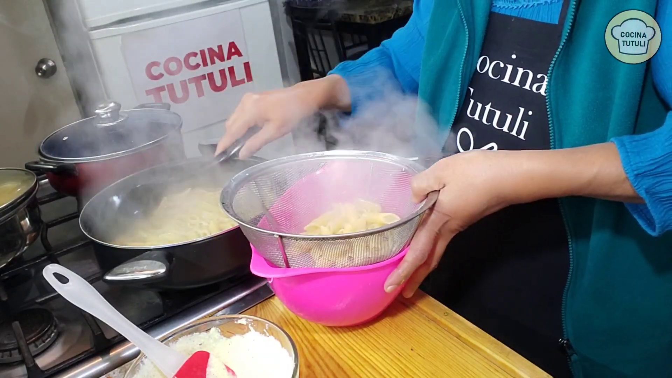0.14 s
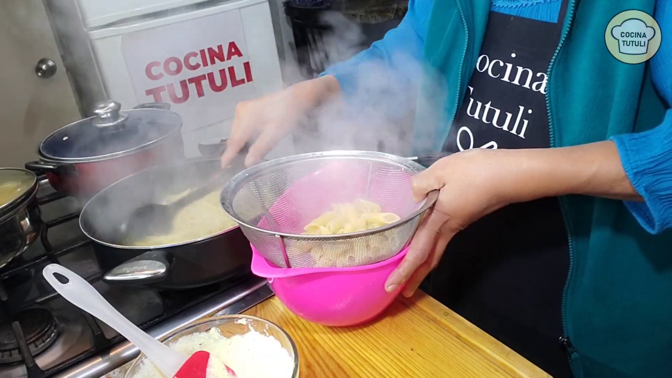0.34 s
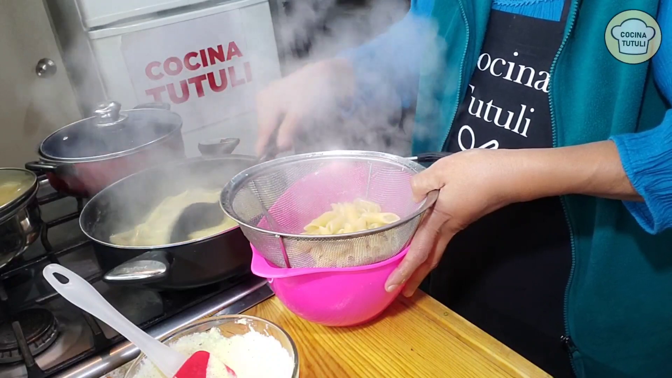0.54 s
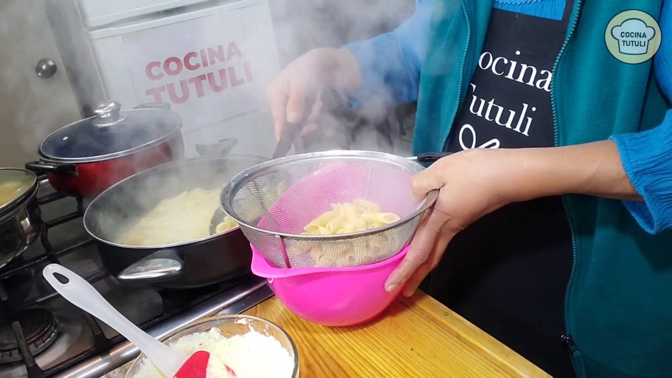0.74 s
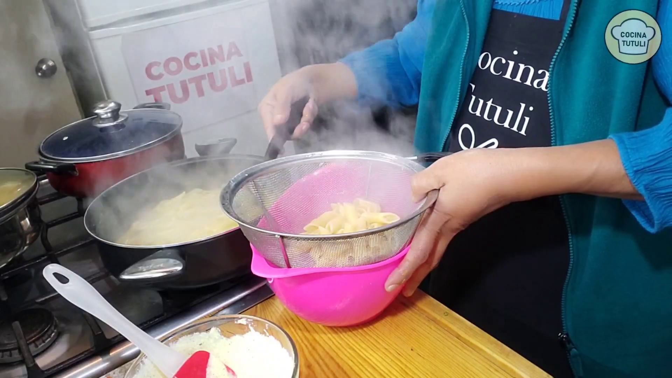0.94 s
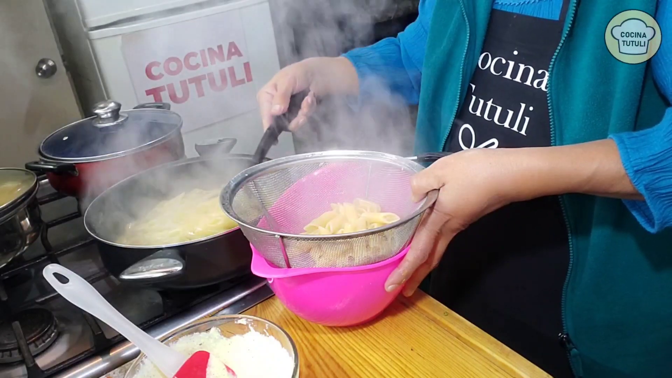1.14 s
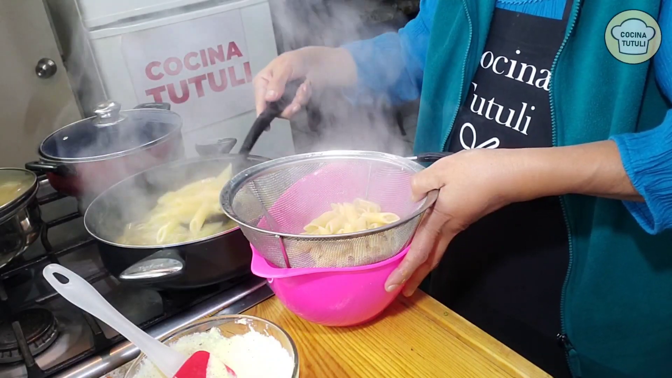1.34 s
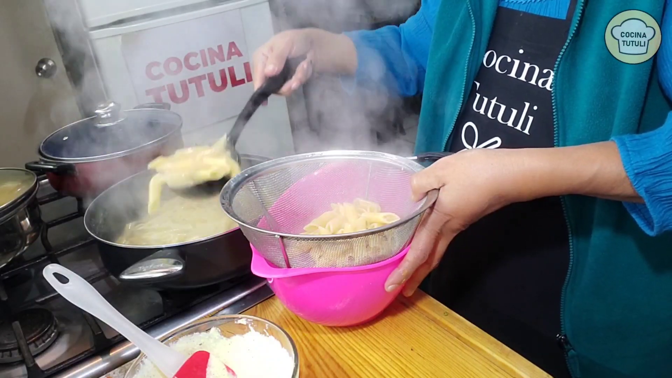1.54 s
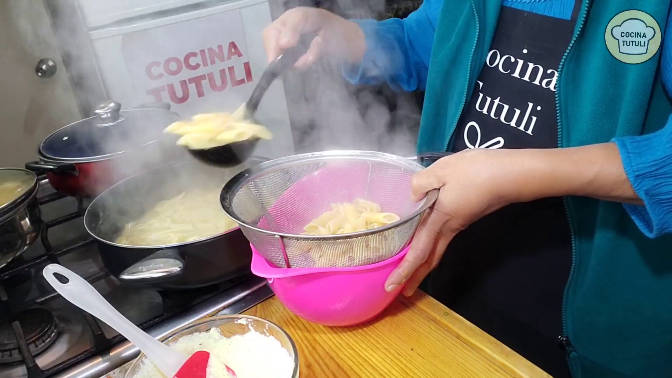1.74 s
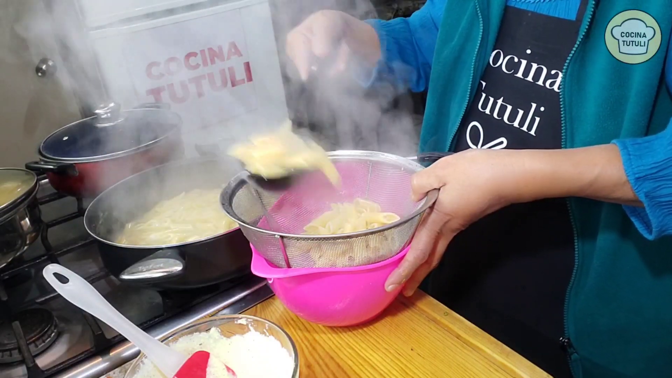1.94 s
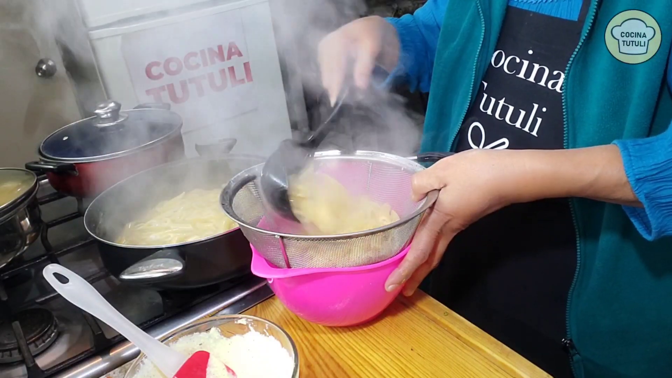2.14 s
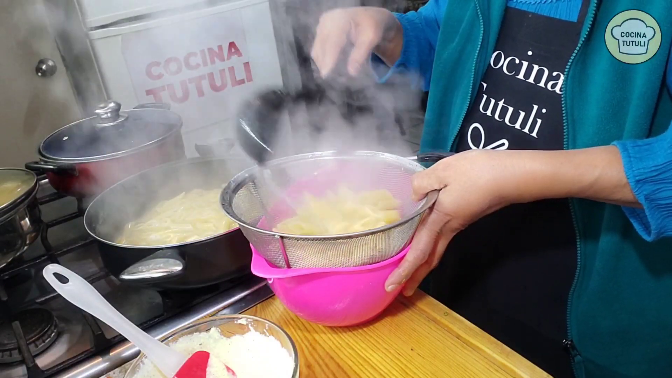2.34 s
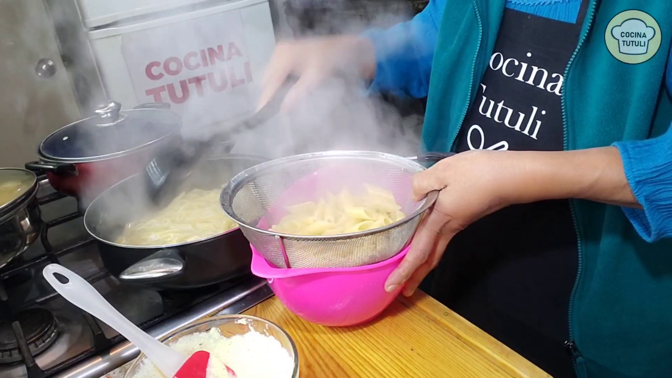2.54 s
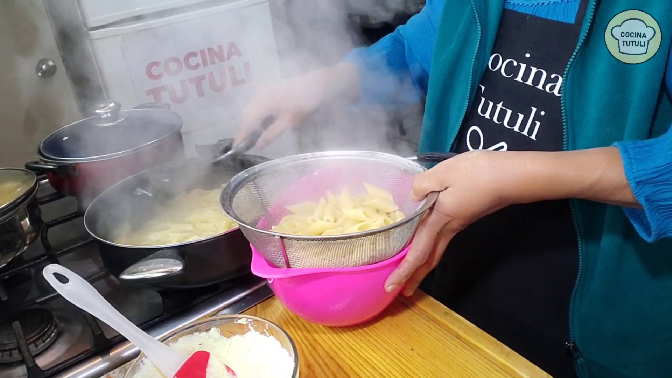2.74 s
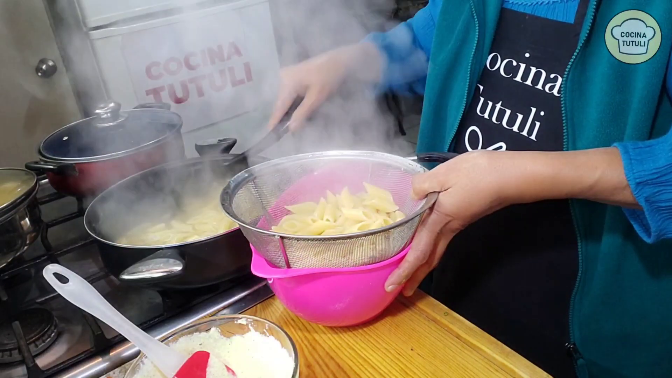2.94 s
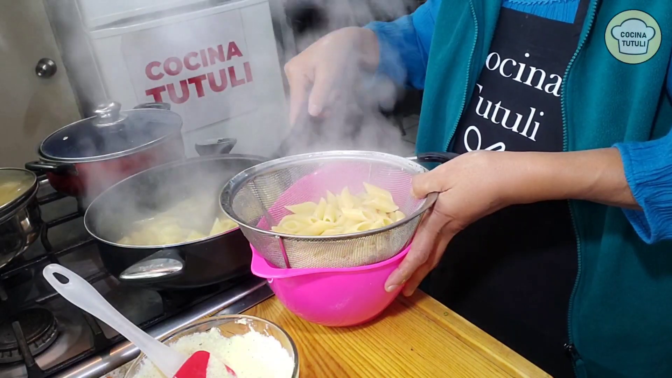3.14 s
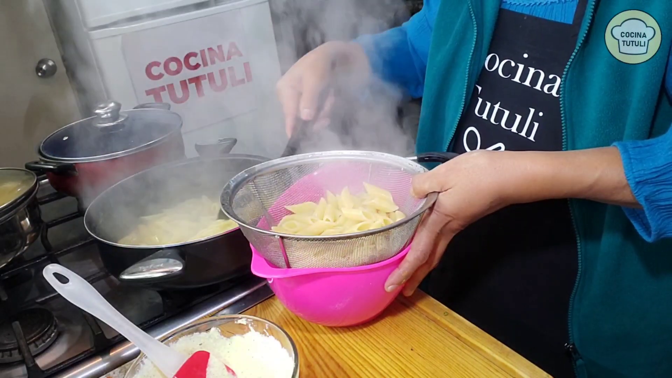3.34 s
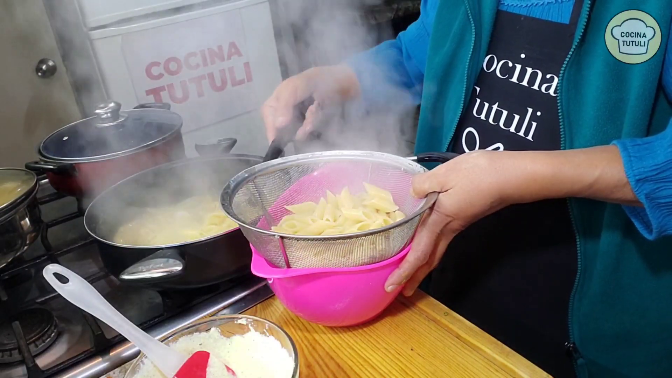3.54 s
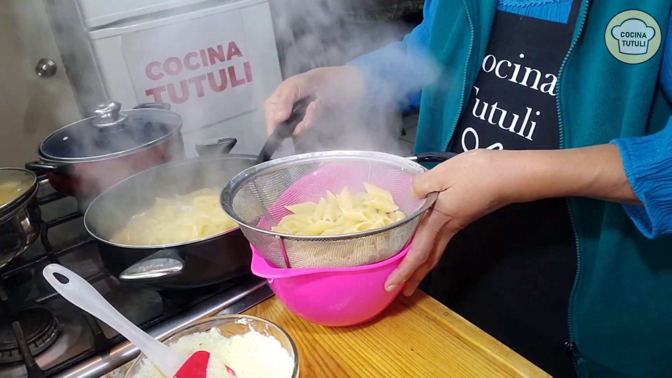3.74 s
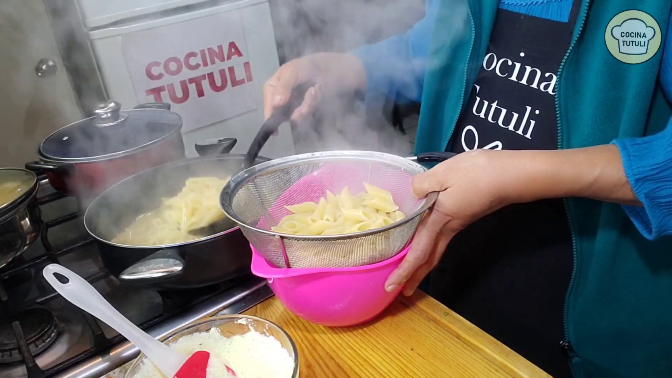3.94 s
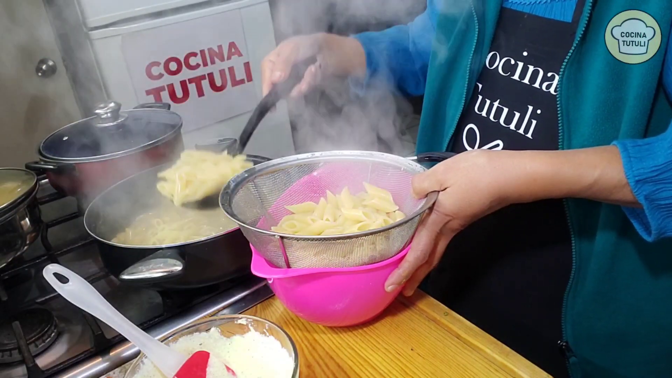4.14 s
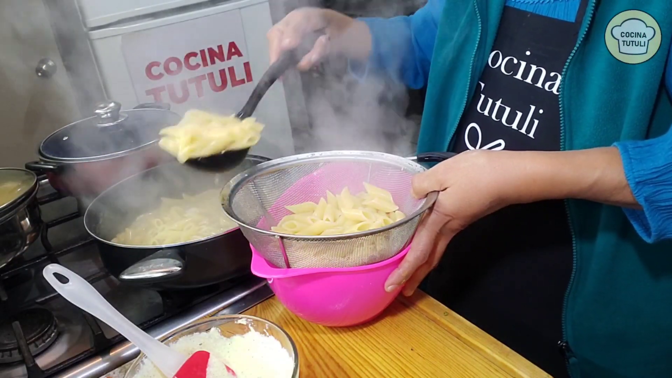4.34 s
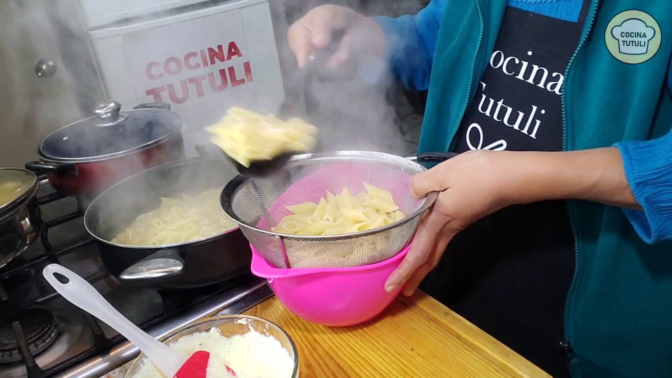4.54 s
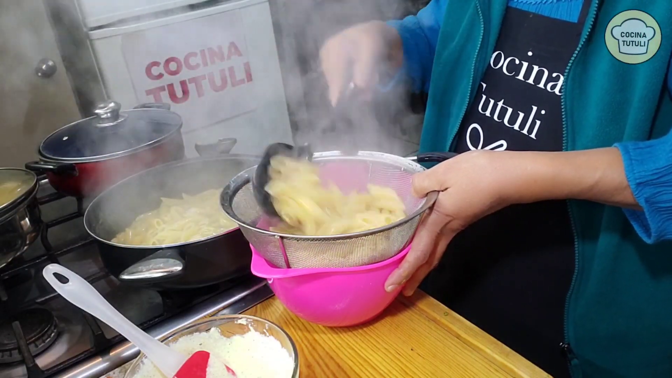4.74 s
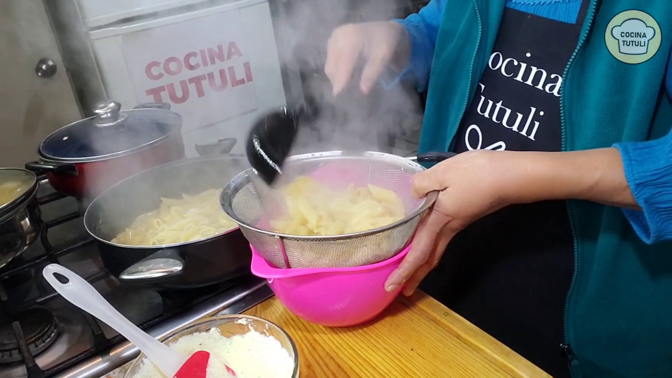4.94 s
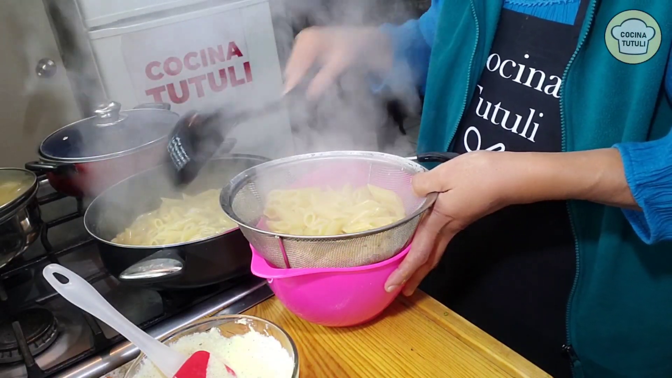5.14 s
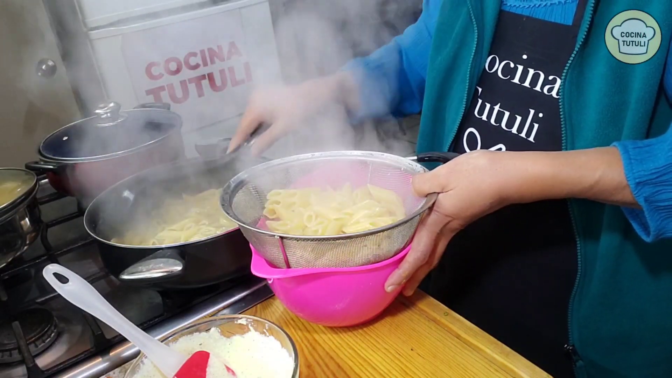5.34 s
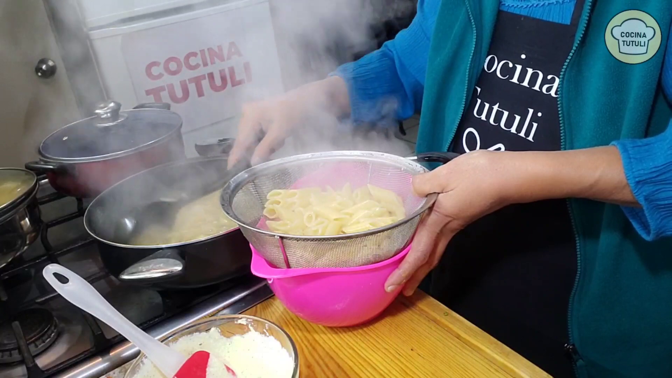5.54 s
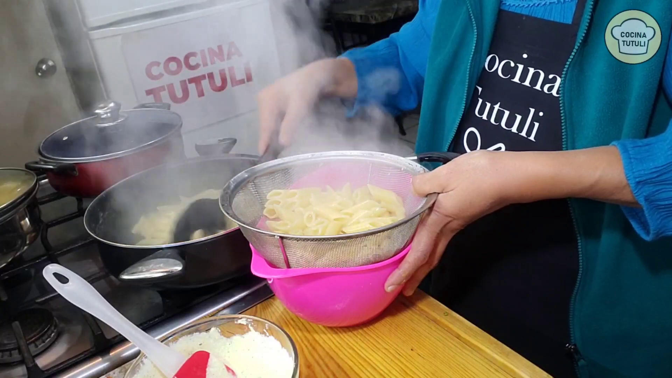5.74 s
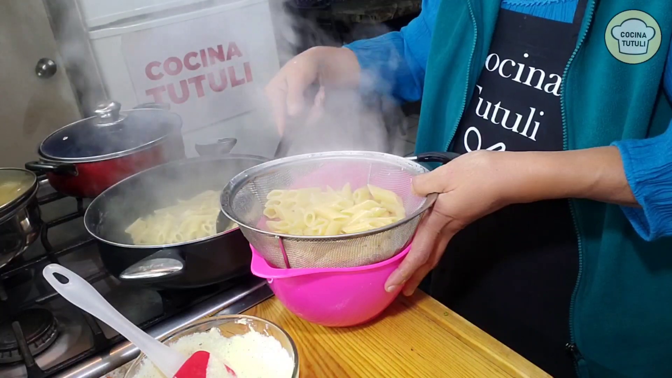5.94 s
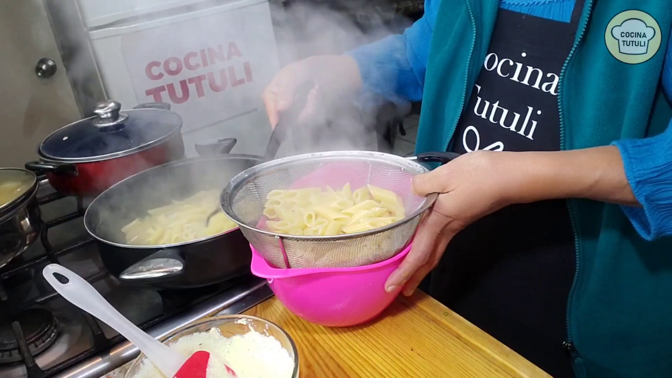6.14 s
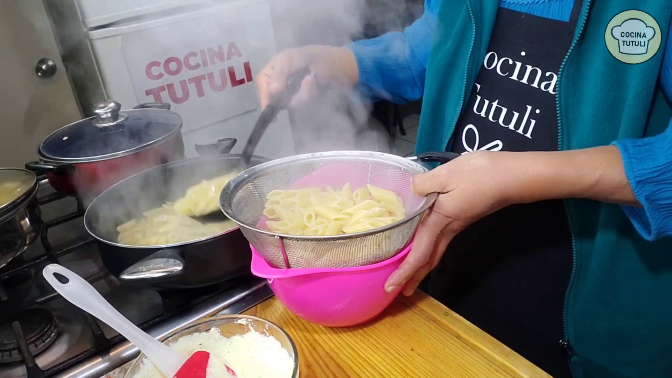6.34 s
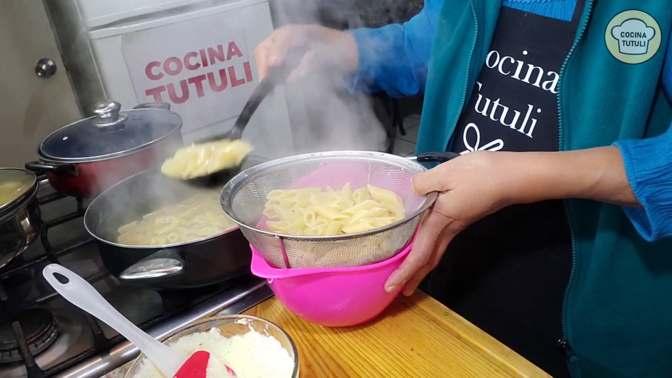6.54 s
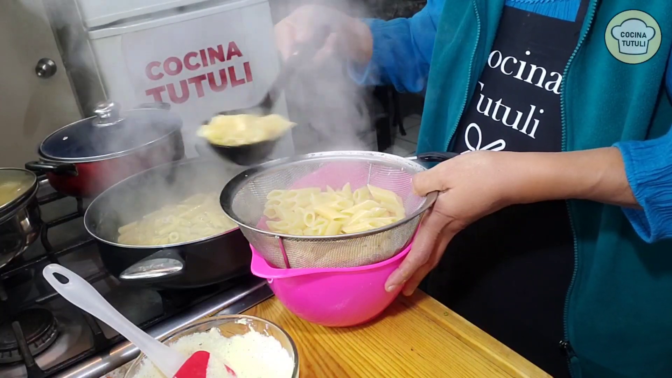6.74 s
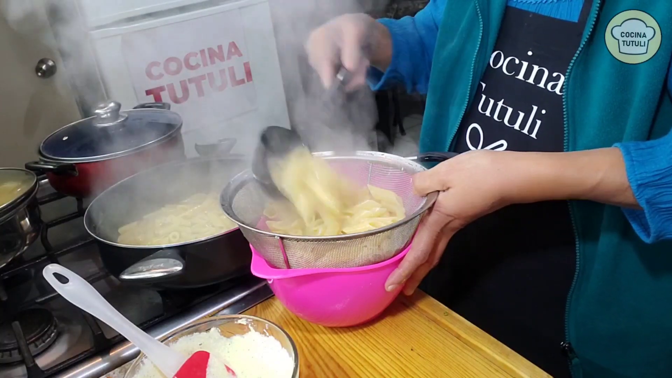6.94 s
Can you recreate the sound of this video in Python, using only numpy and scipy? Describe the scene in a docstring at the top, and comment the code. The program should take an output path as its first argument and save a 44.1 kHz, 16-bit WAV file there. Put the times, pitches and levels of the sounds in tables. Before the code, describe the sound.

A ladle knocks and scrapes in a wide pot of watery boiled pasta, with wet slops and dripping splashes into a strainer over a plastic bowl.

```python
"""A low hum from a wide pot on its stove grate runs throughout, with faint water and room noise; a ladle
knocks from the start. It scoops boiled pasta and tips it into a mesh strainer over a plastic bowl: filtered
noise makes the slosh, spray and scrape, dying sine waves ring the pot, and short noise bursts are the
falling drops. Sparse echoes make the small kitchen, and two microphone ports hear it all."""
import sys
import numpy as np
from scipy import signal
from scipy.fft import rfft, irfft, next_fast_len
from scipy.io import wavfile
from scipy.ndimage import uniform_filter1d

SR = 44100
rng = np.random.default_rng(int(sys.argv[2]) if len(sys.argv) > 2 else 0)


def bounce(signal):
    """Save signal as a 16-bit WAV file at the path given by the first command-line argument."""
    frames = np.transpose(np.atleast_2d(signal))
    limited = np.clip(frames, -1, 1)
    pcm = np.round(limited * 32767).astype(np.int16)
    wavfile.write(sys.argv[1], SR, pcm)


N = 307818  # length of the sound [samples]

# All levels are relative: the mix and the microphone ports scale them further.
# the pot's two bands of hum: (centre [Hz], width of the first of two filters [Hz])
HUM_BANDS = [(59, 15.4), (87, 10)]
# steady hum: (lower band [dB], upper band [dB])
HUM_STEADY = [-54, -56.5]
# the hum swells as the pot is pushed: (start [s], time until the fall [s], lower band [dB], upper band [dB])
HUM_SWELLS = [(0.1, 0.031, -58, -35), (0.36, 0.12, -53, -43), (0.56, 0.15, -46, -63),
              (0.7, 0.016, -47, -36.5), (2.74, 0.26, -51, -56.5), (3.36, 0.11, -47, -46),
              (4.1, 0.34, -70, -58), (5.45, 0.22, -53, -43.5), (5.9, 0.14, -48, -44),
              (6.03, 0.068, -52, -35)]
SWELL_RISE_S, SWELL_FALL_DB_PER_S = 0.078, 174
# the hum dips: (middle [s], half width [s], change of lower band [dB], change of upper band [dB])
HUM_DIPS = [(2.5, 0.35, -5.5, -8), (3.77, 0.11, -3, -15)]

# colour of the quiet room noise: (frequency [Hz], level per Hz [dB])
ROOM_COLOUR = [(12, -18), (20, -8), (53, -30), (79, 0), (138, -15), (234, -2), (410, -56), (802, -9),
               (897, -19), (1120, -10.5), (4180, -71), (7310, -55), (9950, -36), (16000, -45.5)]
ROOM_TONE_DB = -63.5
# how alike the ports are in spread-out sound: (frequency [Hz], likeness [0 to 1, higher is clipped])
PORT_LIKENESS = [(60, 1), (300, 0.85), (600, 0.84), (1500, 0.014), (15000, 0.022)]

# colour of the sloshing water: (frequency [Hz], level per Hz [dB])
SLOSH_COLOUR = [(240, -4), (400, -1), (486, -17), (591, -2), (748, -5.5), (1960, -11), (2260, -12.5),
                (7310, -44.5), (9000, -77), (11700, -59), (19800, -120)]
# colour of the fine spray: (frequency [Hz], level per Hz [dB])
SPRAY_COLOUR = [(880, -8), (1500, -16), (2640, 2), (3200, 4.5), (4240, 0), (7540, -2.5), (9470, -2.5),
                (11700, 0), (14300, -13.5), (16000, -2)]
# colour of the ladle dragging on the pot: (frequency [Hz], level per Hz [dB])
SCRAPE_COLOUR = [(65, -17), (110, -13), (140, -4), (216, 8.5), (260, -9.5), (343, -5.5), (383, -18.5),
                 (483, -12.5), (590, -5), (700, -9.5), (910, -55), (1540, -120)]
# the ladle drawn through the pot: (start [s], time until the fall [s], slosh [dB], spray [dB], drag on the pot [dB])
LADLE_STROKES = [(0.1, 0.11, -68, -67, -65), (0.34, 0.21, -55, -70.5, -63), (0.55, 0.21, -59, -67, -52.5),
                 (1.25, 0.2, -70, -72, -64), (2.74, 0.25, -52, -66.5, -51), (3.3, 0.22, -65.5, -76.5, -67),
                 (3.8, 0.2, -71.5, -73, -63), (4.06, 0.45, -76, -101, -62), (5.38, 0.2, -52.5, -68, -56),
                 (5.59, 0.27, -52, -67, -71), (5.88, 0.2, -59.5, -79, -58.5)]
STROKE_RISE_S, STROKE_FALL_DB_PER_S = 0.054, 62.5
# water running off the ladle, and ladlefuls tipped into the strainer:
# (start [s], time until the fall [s], slosh [dB], spray [dB])
WATER_POURS = [(1.6, 0.29, -72.5, -69), (2.06, 0.11, -62, -55), (2.19, 0.2, -61, -58.5),
               (2.38, 0.25, -56.5, -64.5), (3.1, 0.16, -61, -67), (4.57, 0.1, -67.5, -102),
               (4.68, 0.12, -60, -60), (4.85, 0.13, -65.5, -90), (5.02, 0.3, -66, -70.5)]
POUR_RISE_S, POUR_FALL_DB_PER_S = 0.06, 79
STILL_SLOSH_DB, STILL_SPRAY_DB, STILL_DRAG_DB = -79.5, -84, -67.5
# ringing of the bowl: (frequency [Hz], level [dB], time to fall 60 dB [s])
BOWL_MODES = [(652, 0, .058), (372, -11, .07)]
BOWL_IN_POURS_DB = -13  # against the slosh of the pour

# ringing of the pot with its water, lowest strong mode first:
# (frequency [Hz], level [dB], undamped time to fall 60 dB [s])
POT_MODES = [(167.6, 9.5, 0.29), (235, -10.5, 0.22), (309, -5, 0.099), (291, 14, 0.0093), (342, 5, 0.1),
             (427.4, -10, 0.24), (488.6, -12, 0.13), (548, -11.5, 0.17), (699, -13.5, 0.18),
             (801, -11, 0.18), (962, -18, 0.47), (1120, -27, 0.15), (1723, -16.5, 0.26), (2160, -16, 0.085)]
# ladle against the pot: (time [s], ring of the pot [dB], its lowest mode above that [dB],
# its upper modes above that [dB], rebounds against the blow [dB], ladle knock [dB], knock pitch [Hz],
# crack [dB], damping [factor on the fall times])
LADLE_KNOCKS = [(0.101, -17.5, -16, -8, -15.5, -42.5, 1006, -39.5, 0.55),
                (0.347, -43.5, -11, -3, -6.5, -64, 690, -55, 1.7),
                (0.679, -37, -28, -9, -13, -65, 600, -64, 0.58),
                (1.846, -35.5, -1, 2, -25, -49.5, 705, -68, 0.17),
                (2.7313, -22, -5.5, 1, -6.5, -41.5, 946, -33.5, 0.6),
                (3.352, -39.5, -11.5, -1, -13.5, -64, 760, -52.5, 0.96),
                (4.454, -30.5, -1, 0, -30, -43, 662, -55, 0.19),
                (5.371, -18.5, -6.5, -4, -8, -40, 750, -39.5, 0.71),
                (5.497, -38, -15, -3, 1, -69, 690, -55, 0.53),
                (5.831, -36.5, -10, -2, 1, -50.5, 930, -49, 0.89),
                (6.010, -33.5, -8.5, 2.5, -5, -50.5, 830, -73, 0.68)]
# when the ladle bounces back, after the blow: (time [s])
REBOUND_TIMES = [0.02, 0.054]
UPPER_HZ = 600  # pot modes above this are "upper"

# the clearest drops and splashes: (time [s], slap [dB], slap centre [Hz], fine spray [dB], ring of the bowl [dB])
CLEAR_DROPS = [(0.189, -40.5, 1900, -86, -37.5), (0.2044, -60, 1030, -61.5, -66),
               (0.281, -50, 2550, -80, -71), (0.3543, -46.5, 2700, -70, -62), (0.4623, -47, 2080, -80, -37),
               (0.5739, -45.5, 1800, -71, -69), (0.6352, -49, 2950, -82, -63), (0.678, -41, 1820, -79, -59),
               (0.741, -44.5, 2700, -65, -62), (0.839, -53.5, 2680, -88, -76), (0.875, -47, 1590, -87, -73),
               (1.0846, -53, 4230, -79, -42.5), (1.0942, -45.5, 1640, -68, -46),
               (1.1728, -45.5, 1510, -77, -43), (1.3233, -40, 1370, -53, -54),
               (1.5114, -56.5, 3720, -59.5, -53), (1.642, -50.5, 3400, -60.5, -58),
               (1.7458, -54.5, 3220, -78, -47), (1.868, -74, 990, -59, -54), (2.075, -53, 4000, -64, -49),
               (2.1006, -50, 4540, -55, -71), (2.161, -45, 1170, -66, -66), (2.182, -50, 1120, -72, -51),
               (2.2, -44.5, 1230, -60, -45), (2.233, -49, 2340, -74, -58), (2.258, -39, 1680, -56, -43.5),
               (2.31, -43.5, 1810, -59, -45.5), (2.3393, -45.5, 2800, -51.5, -66),
               (2.3498, -33.5, 1640, -71, -37.5), (2.394, -45, 2600, -56, -63),
               (2.405, -37, 2070, -73, -38), (2.4237, -47, 2840, -70, -64), (2.4432, -39, 3080, -53, -33),
               (2.4629, -43.5, 2660, -69, -45),  (2.4895, -36, 1360, -78, -26),
               (2.5262, -57, 1460, -81, -37), (2.554, -65, 2050, -80, -55), (2.573, -52, 2620, -53.5, -65),
               (2.5915, -41.5, 1380, -66, -68), (2.6172, -39, 1720, -78, -43), (2.686, -54, 2520, -75, -48),
               (2.73, -38, 6560, -50.5, -70), (2.753, -40.5, 3550, -56.5, -72),
               (2.825, -41, 1890, -62, -56), (3.154, -65, 2480, -57.5, -64), (3.182, -45.5, 1780, -66, -66),
               (3.2047, -43, 2270, -65, -76), (3.2445, -47.5, 2600, -59, -75),
               (3.4065, -40, 1170, -75, -71), (3.513, -44, 1380, -76, -86), (3.764, -54.5, 4400, -66, -56),
               (3.8687, -55, 1250, -73, -77), (3.916, -52, 1770, -67, -67), (4.064, -41.5, 1380, -71, -42),
               (4.1004, -74, 1140, -70, -53), (4.305, -49.5, 1290, -80, -56), (4.58, -50.5, 1500, -86, -58),
               (4.73, -46, 2160, -57, -65), (4.7598, -47, 2160, -58, -55), (4.8392, -50, 2550, -81, -51),
               (4.965, -52, 1830, -70, -64), (5.033, -36, 1340, -59, -44), (5.055, -44.5, 1640, -74, -38),
               (5.083, -36, 1850, -66, -43.5), (5.1066, -40.5, 1660, -65, -39.5),
               (5.126, -57, 3700, -65, -46), (5.174, -54, 2560, -66, -54), (5.218, -48.5, 1240, -59.5, -75),
               (5.244, -52.5, 1690, -68, -57), (5.266, -56, 2680, -75, -73),
               (5.2783, -39, 1100, -61, -40.5), (5.348, -39, 1120, -67, -42),
               (5.373, -46.5, 4470, -49.5, -70), (5.395, -43.5, 3930, -61, -70),
               (5.4748, -46, 1300, -61.5, -62), (5.4972, -37, 1720, -70, -66),
               (5.8704, -46, 2140, -71, -43), (5.893, -41, 2080, -85, -37), (5.9445, -46, 1610, -81, -69),
               (5.9797, -46, 1840, -72, -42), (6.1833, -64, 2530, -68.5, -74),
               (6.31, -57, 1050, -60.5, -84), (6.341, -48.5, 1616, -75, -54),
               (6.4869, -44.5, 1100, -84, -37.5), (6.543, -48, 1160, -92, -62),
               (6.6393, -50, 1220, -78, -48), (6.687, -66, 1300, -72, -75), (6.8594, -59, 1550, -93, -79)]
# smaller drops come by chance, thicker where water moves; levels are against the slosh or spray of the moment
PATTER_PER_S = 16  # average over the scene
PATTER_SLAP_DB, PATTER_SPRAY_DB, PATTER_BOWL_DB, PATTER_SPREAD_DB = 5.5, -20.5, -5, 3
PATTER_HZ, PATTER_OCTAVES, PATTER_IN_STROKES_DB = 1800, 0.34, -10.5

# how quickly the kitchen's echo dies: (frequency [Hz], time to fall 60 dB [s])
KITCHEN_DECAY = [(200, 0.37), (1000, 0.23), (4000, 0.27), (12000, 0.16)]
# difference in colour between the ports: (frequency [Hz], left minus right [dB])
PORT_COLOUR = [(60, 5.5), (110, 4.5), (200, 1.5), (380, 3.5), (700, 13), (1290, 4.5), (2380, 6.5),
               (4400, 7.5), (8120, 1.5), (15000, -9)]
LEFT_LATE_S, LATE_ABOVE_HZ = 0.000422, 350  # the full delay is reached well above this frequency
EDGE_HZ = 15850  # treble cutoff of the ports


def gain_of(db):
    """Turns decibels into a factor on amplitude."""
    return 10 ** (np.asarray(db) / 20)


def evened(x):
    """Scales a sound to an rms of 1."""
    return x / np.sqrt(np.mean(x ** 2) + 1e-20)


def read(points, hz):
    """Reads a frequency table between its points, on a logarithmic frequency axis."""
    f, value = np.transpose(points)
    return np.interp(np.log(hz + 1), np.log(f + 1), value)


def add(mix, s, sound):
    """Mixes a sound in at time s, cutting it at the end of the scene."""
    part = mix[..., round(s * SR):][..., :sound.shape[-1]]
    part += sound[..., :part.shape[-1]]


def resonate(x, hz, width_hz):
    """A two-pole resonance that leaves its centre frequency at gain 1."""
    return signal.lfilter(*signal.iirpeak(hz, hz / width_hz, SR), x)


def crackle(per_s, spread_db, grain_s):
    """Uneven loudness: a steady base with short dying bursts, a few of them large."""
    chance = rng.random(N) < per_s / SR
    sizes = gain_of(spread_db * np.minimum(rng.exponential(1, N), 4)) * chance
    bursts = signal.lfilter([1], [1, -np.exp(-1 / (grain_s * SR))], sizes)
    return evened(1 + bursts)


def surges(rows, rise_s, fall_db_per_s):
    """Per level column, the summed power of events that rise, hold and die away."""
    t, power = np.arange(N) / SR, 1e-14
    for start, length, *db in rows:
        fall = gain_of(-fall_db_per_s * np.maximum(t - start - length, 0))
        shape = np.clip((t - start) / rise_s, 0, 1) * fall
        power = power + (gain_of(db)[:, None] * shape) ** 2
    return power


def diffuse(spectrum, patchy_db):
    """Patchy noise at both ports: alike in the bass, nearly unrelated in the treble."""
    frames, hz = N // 256 + 5, np.fft.rfftfreq(1024, 1 / SR)
    a, b, c, d, patches = rng.standard_normal((frames, 513, 5)).T
    patches = uniform_filter1d(patches, size=14, axis=0)  # smooth over frequency
    patches = evened(uniform_filter1d(patches, size=8, axis=1))  # smooth over time
    same = np.clip(read(PORT_LIKENESS, hz), 0, 1)[:, None]
    right = a + 1j * b
    left = same * right + np.sqrt(1 - same ** 2) * (c + 1j * d)
    z = np.array([left, right]) * gain_of(read(spectrum, hz)[:, None] + patchy_db * patches)
    return evened(signal.istft(z, nperseg=1024, noverlap=768)[1][:, :N])


def hum():
    """The pot on its grate: two narrow bands of rumble whose pitch wavers more than their strength."""
    out, t = np.zeros(N), np.arange(N) / SR
    dip_db = sum(np.array(db)[:, None] * np.exp(-((t - s) / half) ** 2) for s, half, *db in HUM_DIPS)
    steady = gain_of(np.array(HUM_STEADY)[:, None] + dip_db)
    levels = np.sqrt(steady ** 2 + surges(HUM_SWELLS, SWELL_RISE_S, SWELL_FALL_DB_PER_S))
    for level, (hz, width) in zip(levels, HUM_BANDS):
        rumble = resonate(resonate(rng.standard_normal(N), hz, width), hz, 2 * width)
        band = signal.hilbert(rumble, next_fast_len(N))[:N]
        flatter = (band / abs(band) ** 0.22).real  # smaller swings in strength
        out += level * evened(flatter)
    return out


def room_tone():
    """Quiet, patchy background noise of the room."""
    return gain_of(ROOM_TONE_DB) * diffuse(ROOM_COLOUR, patchy_db=4.2)


def motion():
    """Levels of slosh, spray and drag: strokes and pours over nearly still water."""
    strokes = surges(LADLE_STROKES, STROKE_RISE_S, STROKE_FALL_DB_PER_S)
    pours = surges(WATER_POURS, POUR_RISE_S, POUR_FALL_DB_PER_S)
    still = gain_of([STILL_SLOSH_DB, STILL_SPRAY_DB, STILL_DRAG_DB]) ** 2
    pours_without_drag = np.vstack([pours, np.zeros(N)])
    return np.sqrt(strokes + pours_without_drag + still[:, None])


def pour_level():
    """Slosh level of the pours alone."""
    return np.sqrt(surges(WATER_POURS, POUR_RISE_S, POUR_FALL_DB_PER_S)[0])


def bubbles(per_s, spread_db):
    """Small bubbles of many sizes, each a few cycles that rise in pitch."""
    out, t = np.zeros((2, N)), np.arange(600) / SR
    for hz in np.geomspace(900, 3600, 16):
        blip = np.sin(2 * np.pi * hz * t * (1 + 12 * t))
        blip *= np.exp(-t * hz / 7.1) * (1 - np.exp(-t / 0.00147))
        chance = rng.random((2, N)) < per_s / 16 / SR
        sizes = gain_of(spread_db * np.minimum(rng.exponential(1, (2, N)), 4)) * chance
        out += signal.oaconvolve(sizes, blip[None], axes=1)[:, :N]
    return evened(out + 0.5 * out[::-1])  # each port also hears the other's bubbles


def slosh():
    """Moving water: grainy noise with quieter bubbles in it."""
    water = diffuse(SLOSH_COLOUR, patchy_db=1.5) * crackle(per_s=150, spread_db=1.3, grain_s=0.004)
    return water + gain_of(-19.5) * bubbles(per_s=250, spread_db=-4.5)


def fine_spray():
    """Fine spray: grainy noise with much treble."""
    return diffuse(SPRAY_COLOUR, patchy_db=1.5) * crackle(per_s=150, spread_db=2.2, grain_s=0.006)


def scrape():
    """The ladle dragged on the pot: grainy low noise, and steady rubbing that rings the pot's modes."""
    drag = diffuse(SCRAPE_COLOUR, patchy_db=1.5) * crackle(per_s=60, spread_db=1.5, grain_s=0.008)
    rub = rng.standard_normal(N)
    ring = sum(gain_of(db) * t60 * evened(resonate(rub, hz, 3 / t60)) for hz, db, t60 in POT_MODES[2:])
    return drag + gain_of(-9) * evened(ring)


def bowl_under_pours():
    """Uneven noise, like many small hits, rings the bowl under each pour."""
    hits = rng.standard_normal(N) * crackle(per_s=90, spread_db=4, grain_s=0.004)
    ring = sum(gain_of(db) * evened(resonate(hits, hz, 2.2 / t60)) for hz, db, t60 in BOWL_MODES)
    return gain_of(BOWL_IN_POURS_DB) * evened(ring) * pour_level()


def stir():
    """Slosh, spray and scrape follow the moving ladle and water, with the bowl under the pours."""
    slosh_level, spray_level, drag_level = motion()
    moving = slosh_level * slosh() + spray_level * fine_spray() + drag_level * scrape()
    return moving + bowl_under_pours()


def pot_ring(pot_db, low_db, upper_db, damping, t):
    """The pot's modes as dying sine waves; low modes take longer to build up."""
    ring = np.zeros(len(t))
    for k, (hz, db, t60) in enumerate(POT_MODES):
        mode_db = db + low_db * (k == 0) + upper_db * (hz > UPPER_HZ)
        fading = gain_of(mode_db - 60 * t / (t60 * damping))
        build_up = 1 - np.exp(-t / (0.023 * (168 / hz) ** 3))
        ring += (-1) ** k * fading * np.sin(2 * np.pi * hz * t) * build_up
    return gain_of(pot_db) * ring


def knocks():
    """A blow, two rebounds and a short rattle ring the pot; the ladle itself knocks dully and cracks."""
    out, t = np.zeros((2, N)), np.arange(SR // 2) / SR
    soft = np.sin(np.pi / 2 * np.minimum(t / 0.003, 1)) ** 2  # the ladle is soft: no sharp edge
    for s, pot_db, low_db, upper_db, rebound_db, knock_db, knock_hz, crack_db, damping in LADLE_KNOCKS:
        noise = rng.standard_normal((4, len(t)))
        rattle = 0.067 * noise[0] * np.exp(-t / 0.075)
        blow = np.exp(-t / 0.0003) + rattle
        for late in REBOUND_TIMES:
            blow += gain_of(rebound_db) * np.exp(-(t - late) / 0.00024) * (t >= late)
        ring = pot_ring(pot_db, low_db, upper_db, damping, t)
        body = signal.fftconvolve(blow / blow[:80].sum(), ring)[:len(t)]
        knock = np.sin(2 * np.pi * knock_hz * t) * np.exp(-t / 0.0064)
        # water and pasta pushed aside, differently at each port
        rustle = evened(resonate(resonate(noise[2:], 900, 700), 900, 1400))
        rustle *= np.exp(-t / (0.045 * damping))
        crack = evened(resonate(resonate(noise[1], 1150, 3210), 1400, 2900))
        crack *= np.exp(-t / 0.0073) + 0.1 * np.exp(-t / 0.085)
        ladle = gain_of(knock_db) * (2.65 * knock + 0.86 * rustle) + 1.05 * gain_of(crack_db) * crack
        add(out, s, 0.59 * body + soft * ladle)
    return signal.sosfilt(signal.butter(2, 4500, fs=SR, output="sos"), out)  # the knocks carry little above 4.5 kHz


def patter():
    """Chance rows like those of the clear drops, thick while water pours and thinner during strokes."""
    slosh_level, spray_level, _ = motion()
    busy = pour_level() + gain_of(PATTER_IN_STROKES_DB) * slosh_level
    count = round(PATTER_PER_S * N / SR)
    when, luck = rng.random(count), np.clip(rng.standard_normal((count, 4)), -2, 2)
    at = np.minimum(np.searchsorted(np.cumsum(busy) / busy.sum(), when), N - 1)
    slosh_db, spray_db = 20 * np.log10(slosh_level[at]), 20 * np.log10(spray_level[at])
    slap, fine, bowl = PATTER_SPREAD_DB * luck[:, :3].T
    hz = PATTER_HZ * 2 ** (PATTER_OCTAVES * luck[:, 3])
    return list(zip(np.maximum(at / SR, 0.01), slosh_db + PATTER_SLAP_DB + slap, hz,
                    spray_db + PATTER_SPRAY_DB + fine, slosh_db + PATTER_BOWL_DB + bowl))


def drops():
    """Each drop: a dry, wide slap, a hiss of spray, and the air in the bowl ringing."""
    out, t = np.zeros((2, N)), np.arange(4000) / SR
    treble = signal.butter(4, 8300, "high", fs=SR, output="sos")
    rise = 1 - np.exp(-(t / 0.00069) ** 2)
    for s, db, hz, spray_db, bowl_db in CLEAR_DROPS + patter():
        noise, (side, size) = rng.standard_normal((3, len(t))), rng.standard_normal(2)
        burst = noise[0] + 0.93 * noise[1:]  # a part shared by the ports and a part of each one's own
        wet = resonate(burst, hz, 350 + 0.073 * hz) + 0.21 * resonate(burst, 1.45 * hz, 1300)
        wet = resonate(resonate(wet, 0.96 * hz, 1.6 * hz), 0.96 * hz, 1.6 * hz)
        slap = wet / np.std(wet[:, :150]) * (np.exp(-t / 0.0026) + 0.13 * np.exp(-t / 0.014))
        spray = evened(resonate(signal.sosfilt(treble, noise[1:]), 9930, 3000))
        spray *= np.exp(-t / 0.0022) + 0.077 * np.exp(-t / 0.049)
        ring = np.zeros(len(t))
        for bowl_hz, mode_db, t60 in BOWL_MODES:
            tone = np.sin(2 * np.pi * bowl_hz * (1 + 0.016 * size) * t)  # pitch varies a little by drop
            ring += tone * gain_of(bowl_db + mode_db - 60 * t / t60)
        ring *= 1 - np.exp(-t / 0.004)
        drop = rise * (0.85 * gain_of(db) * slap + 2.9 * gain_of(spray_db) * spray + 0.57 * ring)
        # drops land left and right: louder and sooner at the nearer port
        add(out[0], s - 0.0001 * side, gain_of(0.66 * side) * drop[0])
        add(out[1], s + 0.0001 * side, gain_of(-1.5 * side) * drop[1])
    return out


def kitchen(x):
    """Three tails of sparse echoes, fed in turn so the echoes keep changing; each band dies at its own speed."""
    taps = np.zeros((3, 2, SR // 2))
    at = np.arange(100, SR // 2 - 20, 20) + rng.integers(0, 20, (3, 2, (SR // 2 - 101) // 20))
    np.put_along_axis(taps, at, rng.choice([-1., 1.], at.shape), 2)
    hz, t, z = signal.stft(taps, SR, nperseg=256)
    same = np.clip(read(PORT_LIKENESS, hz), 0, 1)[:, None]
    z[:, 0] = same * z[:, 1] + np.sqrt(1 - same ** 2) * z[:, 0]  # the bass reaches both ports alike
    fading = gain_of(-60 * t / read(KITCHEN_DECAY, hz)[:, None])
    tails = signal.istft(z * fading, SR, nperseg=256)[1]
    cycles = np.arange(N) / SR * 1.3 + np.arange(3)[:, None, None] / 3  # a steady 1.3 turns per second
    turn = np.cos(2 * np.pi * cycles) * np.sqrt(2 / 3)
    return signal.fftconvolve(x * turn, tails / np.linalg.norm(tails[0, 0]), axes=2)[..., :N].sum(0)


def scene():
    """Blows and drops fill the kitchen with echoes, over the hum, stirring and room noise."""
    steady = hum() + room_tone() + stir()
    blows, water = knocks(), drops()
    echoes = kitchen(gain_of(-5) * blows + gain_of(-4.5) * water)
    return steady + blows + water + echoes


def record(dry):
    """The ports differ in colour, the left hears all but the bass later; both lose deep bass and treble."""
    size = next_fast_len(N)
    hz = np.fft.rfftfreq(size, 1 / SR)
    dip_db = -6 * np.exp(-((hz - 7500) / 900) ** 2)
    bass_cut = hz ** 3 / np.sqrt(hz ** 6 + 41.7 ** 6)
    late_s = LEFT_LATE_S / (1 + (LATE_ABOVE_HZ / (hz + 1)) ** 6)
    colour = gain_of(dip_db + np.array([[0.5], [-0.5]]) * read(PORT_COLOUR, hz))
    delay = np.array([np.exp(-2j * np.pi * hz * late_s), np.ones(len(hz))])
    heard = irfft(rfft(dry, size) * bass_cut * colour * delay, size)[:, :N]
    treble_cut = signal.firwin(511, EDGE_HZ, window=("kaiser", 9), fs=SR)
    return signal.oaconvolve(heard, treble_cut[None], "same")


dry = scene()
out = record(dry)
bounce(out)
```